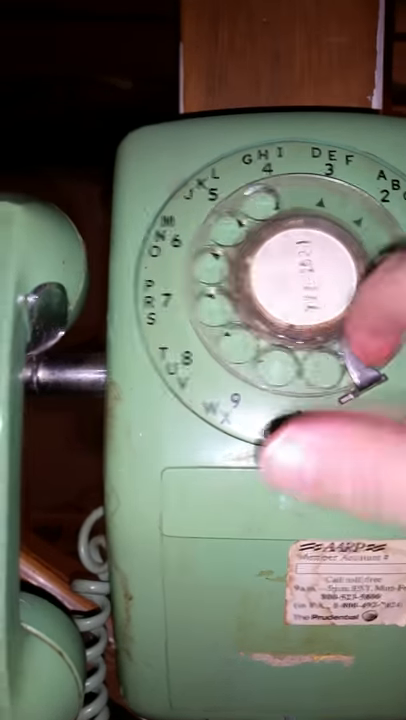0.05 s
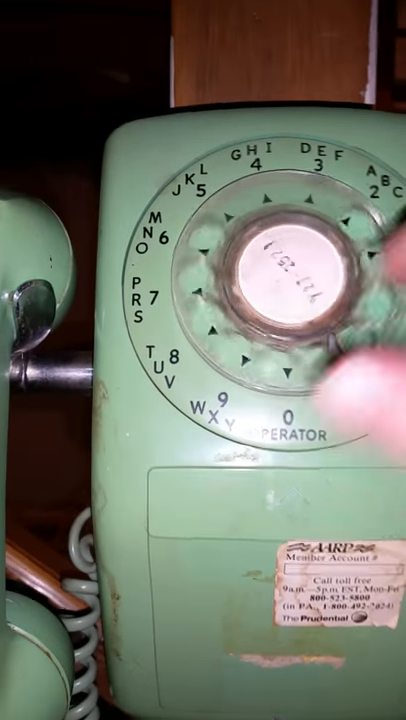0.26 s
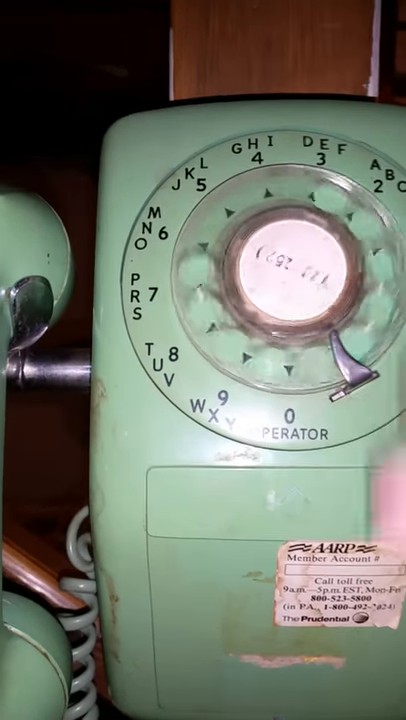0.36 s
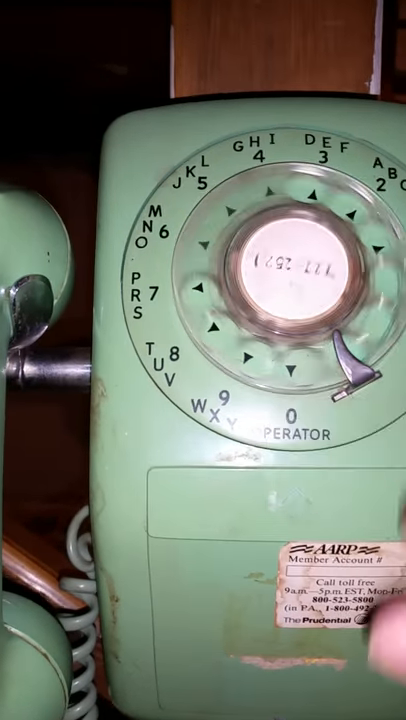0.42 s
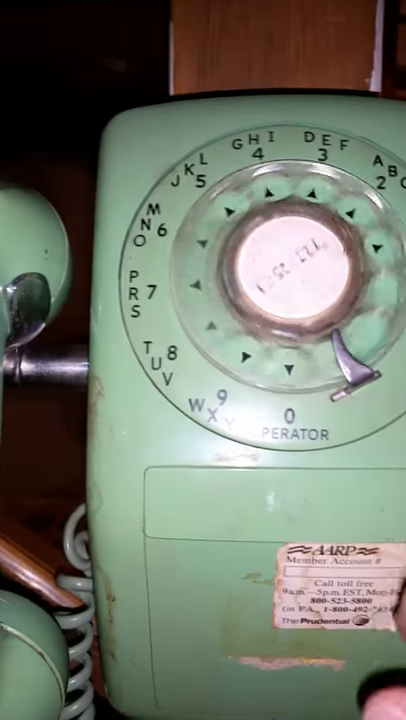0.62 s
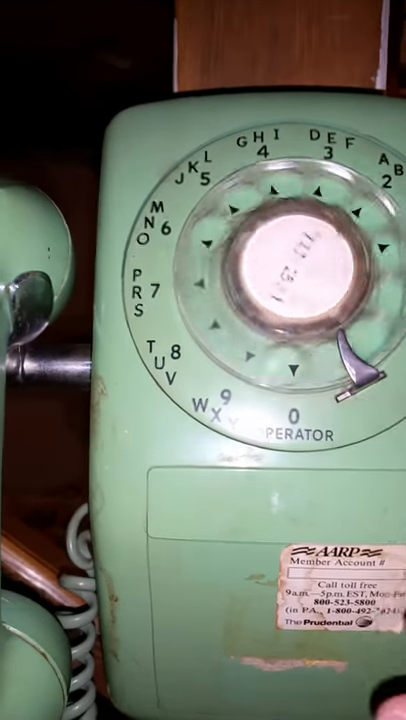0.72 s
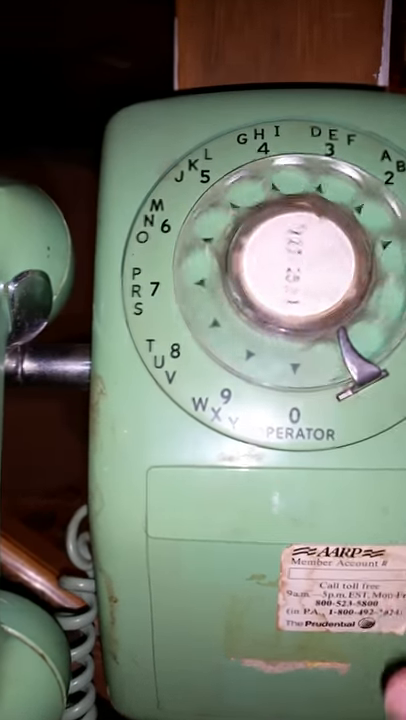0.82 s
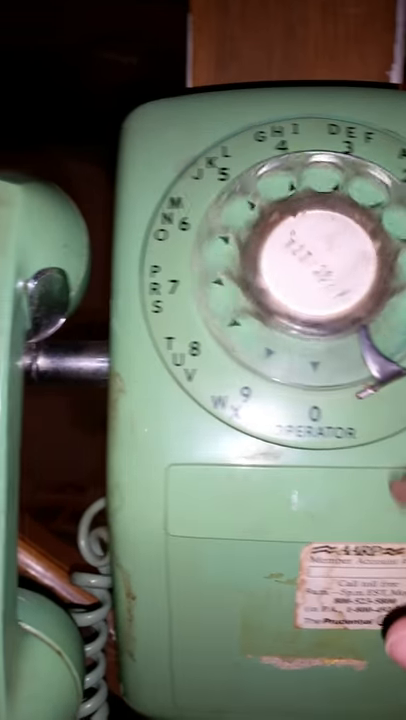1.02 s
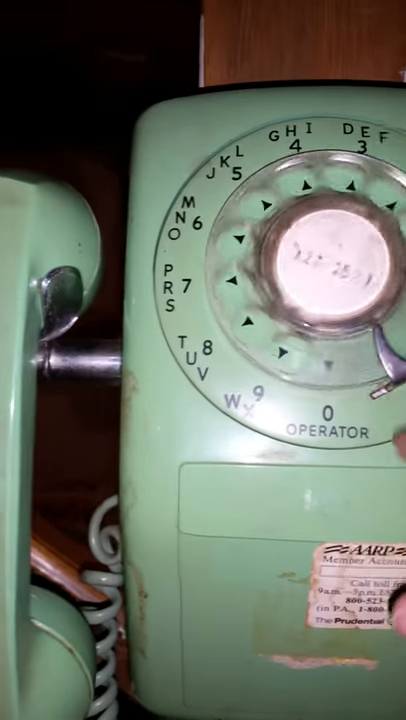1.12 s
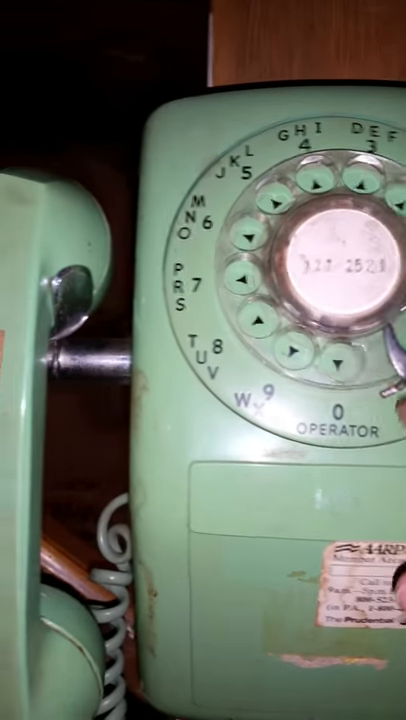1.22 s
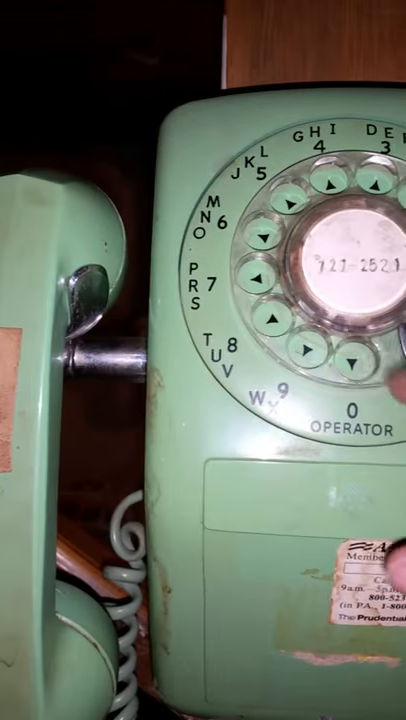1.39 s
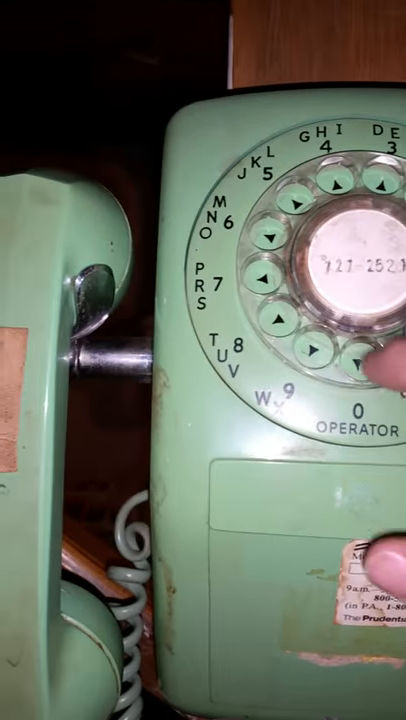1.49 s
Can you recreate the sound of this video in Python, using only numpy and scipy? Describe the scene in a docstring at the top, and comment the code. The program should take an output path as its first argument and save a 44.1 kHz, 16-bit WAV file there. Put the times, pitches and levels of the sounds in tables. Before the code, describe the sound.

Close rotary telephone dial clacking, then whirring and ticking home in a quiet room.

```python
"""A rotary telephone dial runs home, close by in a quiet room. The finger lets go and the wheel snaps
back with a clack; the spring drives whirring gears against a spinning governor, the contacts tick,
and the wheel lands on its stop. Knocks ring the hollow plastic housing, and the metal inside rings
on faintly. Soft air noise and a low hum lie underneath."""
import sys
import numpy as np
from scipy import signal
from scipy.fft import rfft, irfft
from scipy.io import wavfile
from scipy.ndimage import uniform_filter1d

SR = 44100
rng = np.random.default_rng(int(sys.argv[2]) if len(sys.argv) > 2 else 0)


def store_pcm(level_fs):
    """Save levels as 16-bit WAV."""
    pcm = np.round(np.clip(level_fs, -1, 1) * 32767).astype(np.int16)
    wavfile.write(sys.argv[1], SR, np.atleast_2d(pcm).T)


N = 68355
T = np.arange(N) / SR
HZ = np.fft.rfftfreq(4096, 1 / SR)  # frequency axis of the filter curves
CONTACT_RISE_S = 0.00021


def clacks(size=4096):
    """Each sharp blow chatters briefly and rings the dial's close resonances."""
    # blows: start_s, level_db, chatter_s, cutoff_hz, wheel_lift_db
    blows = [(0.068, -31.5, 0.0014, 6700, -3), (0.1823, -38.5, .002, 5940, -6),
             (0.2049, -27, 0.0022, 7000, 7), (0.2069, -14, 0.001, 6000, 9), (0.2077, 0, 0.0019, 14000, 0.5),
             (0.2125, -15.5, 0.0014, 9000, 2), (0.2227, -23, 0.0012, 7000, 2),
             (1.48, -27, 0.00071, 9000, 17)]
    # dial resonances: centre_hz, width_hz, left_db, right_db
    resonances = [(2550, 66, -23, -5.5), (2930, 113, -19.5, -7.5), (3350, 180, -8, -5.5),
                  (3830, 96, -8.5, -2), (4100, 140, -6, -6.5), (4125, 102, -10, -0.5),
                  (4540, 63, -7.5, -10.5), (5090, 110, -5.5, -14), (5400, 170, -9, -2),
                  (5760, 164, -11.5, 0), (6250, 164, -23, -2.5), (7050, 260, -28, -19),
                  (7730, 200, -33, -13.5), (9030, 590, -14, -16.5), (11280, 380, -15, -12)]
    floor_db, gain_db, low_cut_hz = -26.5, 12.5, 900
    peaks = sum(amp([[left], [right]]) ** 2 * bump(hz, width) for hz, width, left, right in resonances)
    ring_db = 10 * np.log10(amp(floor_db) ** 2 + peaks)
    ring_db -= 20 * np.log10(1 + (low_cut_hz / (HZ + 20)) ** 2)  # a small dial radiates no bass
    wheel_peak = bump(hz=6720, width_hz=690)
    out = np.zeros((2, N))
    for start_s, level_db, chatter_s, cutoff_hz, wheel_lift_db in blows:
        chatter = eased(burst(chatter_s, size), CONTACT_RISE_S)
        blow = unit(colour(chatter, ring_db + wheel_lift_db * wheel_peak))
        add(out, start_s, amp(gain_db + level_db) * dulled(blow, cutoff_hz))
    return out


def knocks(size=8192, gain_db=4.5, modes_db=-12):
    """The hollow housing answers dull knocks with a few clear modes among many close ones."""
    # knocks: start_s, level_db, cutoff_hz
    blows = [(0.0717, -14.5, 1030), (0.1891, -16, 3600), (0.2091, 2, 3500), (0.2214, -9, 2200),
             (1.113, -17, 1110), (1.2454, -15, 750), (1.258, -19.5, 3200), (1.483, -21.5, 1450)]
    # clearest housing modes: pitch_hz, t60_s, left_db, right_db
    clear_modes = [(445, 0.048, -25, -1.5), (505, 0.076, -23, 3), (670, 0.17, 0, -10), (842, 0.069, 5, -8),
                   (1012.5, .09, -1.5, 0), (1194, 0.22, -4.5, -25), (1689, 0.046, -1.5, -15),
                   (1816, 0.11, -3, 0)]
    # spectrum of the close modes: freq_hz, gain_db
    spectrum = [(60, -41.5), (200, -6.5), (350, -3.5), (500, 4.5), (620, -9), (780, 1.5), (1250, -4.5),
                (1700, 1), (2200, -9), (3500, -7.5), (7000, -18), (16000, -20.5)]
    # their decay: freq_hz, t60_s
    decay = [(200, 0.45), (350, .3), (600, 0.19), (1000, .14), (1700, 0.08), (5000, 0.023)]
    ring = amp(modes_db) * modes(clear_modes, size)
    out = np.zeros((2, N))
    for start_s, level_db, cutoff_hz in blows:
        dense = unit(colour(tail(decay, size), read(spectrum, HZ)))
        body = eased(ring + dense, rise_s=0.00035)
        add(out, start_s, amp(gain_db + level_db) * dulled(body, cutoff_hz))
    return out


def ticks(gain_db=-5.5, ring_db=7.5):
    """Small metal parts snap against each other as the wheel comes home."""
    # contacts and end stop: start_s, level_db, decay_s, pitch_hz
    snaps = [(0.313, -3, 0.0076, 5840), (0.543, -19, 0.002, 5300), (0.695, -8.5, 0.0007, 3600),
             (0.702, -2.5, 0.0015, 3530), (0.8214, 0.5, 0.0019, 5400), (0.826, -10, 0.0023, 5430),
             (0.876, -9, 0.0034, 4100), (0.926, -6.5, .0014, 3560), (0.9316, -1, 0.005, 3500),
             (1.049, -11, 0.0048, 4230), (1.052, 0, 0.0032, 4220), (1.151, -6, 0.0022, 5900),
             (1.18, -12, 0.003, 5900), (1.2534, -3.5, 0.0046, 5860), (1.2562, 1, 0.0034, 3450)]
    # tick spectrum: freq_hz, gain_db
    spectrum = [(200, -39), (1200, -10.5), (2600, -9.5), (3600, 2.5), (6000, -1.5), (7500, -8),
                (12000, -14), (16000, -19)]
    out = np.zeros((2, N))
    for start_s, level_db, decay_s, pitch_hz in snaps:
        chatter = eased(burst(decay_s), CONTACT_RISE_S)
        tick = colour(chatter, read(spectrum, HZ) + ring_db * bump(pitch_hz, width_hz=250))
        add(out, start_s, amp(gain_db + level_db) * unit(tick))
    return out * pan(db=-6)


def whirr():
    """Gears and governor run from release to stop; the gears also rustle as the finger ends its pull."""
    # governor speed: time_s, weight_passes_per_s
    speed = [(0.24, 76), (0.42, 80), (0.52, 79), (0.68, 76), (0.9, 77.8), (1.25, 70)]
    release_s, stop_s, spin_up_s, run_down_s = 0.235, 1.2527, 0.02, 0.0092
    pull_db, pull_end_s = -24, 0.14
    running = np.clip((T - release_s) / spin_up_s, 0, 1)
    running *= np.exp(-np.maximum(T - stop_s, 0) / run_down_s)
    pulling = amp(pull_db) * np.clip(1 - (T / pull_end_s) ** 2, 0, 1)
    pass_hz = np.interp(T, *np.transpose(speed)) * (1 + 0.004 * drift(hz=3.75))
    passes = np.cumsum(pass_hz) / SR
    throb, wobble = np.cos(2 * np.pi * passes), np.cos(np.pi * passes)  # two weights, one rubs harder
    drive = teeth_and_rub() * (1 + 0.13 * throb + 0.1 * wobble) * amp(0.97 * drift(hz=35))
    gears = gear_frame(drive)
    governor = governor_cup(drive) + governor_shoes(throb) + governor_hum(passes)
    return gears * (running + pulling) + governor * running


def teeth_and_rub(teeth_per_s=2600, spread_db=1.5, rub_gain=0.72):
    """Random tooth impacts over the friction noise of the governor."""
    impacts = (rng.random(N) < teeth_per_s / SR) * rng.choice([-1., 1.], N)
    impacts *= amp(spread_db * np.minimum(rng.exponential(1, N), 3))
    teeth = signal.fftconvolve(impacts[None], burst(decay_s=0.00095), axes=1)[:, :N]
    return unit_rms(unit_rms(teeth) + rub_gain * rng.standard_normal((2, N)))


def gear_frame(drive):
    """Teeth and friction shake the frame and its resonances."""
    # gear spectrum: freq_hz, left_db, right_db
    spectrum = [(92, -28, -22.5), (338, -12.5, -9), (760, -8, -8.5), (1360, -7.5, -9), (2150, -6.5, -5),
                (2870, -8.5, -5.5), (3930, -4, 0.5), (4740, -6.5, -7), (5210, -8, 0.5), (6700, -10, 3.5),
                (7020, -19, -8.5), (8930, -12.5, -18.5), (10300, -18, -18), (11700, -12.5, -11.5),
                (13200, -16, -17.5), (15700, -21, -17)]
    # frame resonances: centre_hz, width_hz, left_lift_db, right_lift_db
    resonances = [(540, 26, 3, 6), (745, 30, -8, -8), (1010, 26, 7, 8), (1183, 28, 7, 2), (1410, 70, 6, 4),
                  (1690, 50, -5, -5), (1830, 40, 2, 2), (1980, 60, 2, 3), (2140, 40, -5, -5),
                  (2290, 40, 4, 9), (2720, 30, 2, 3), (2890, 55, 5, 6), (3100, 40, 1, 3),
                  (3250, 60, -2, -3), (3490, 45, 2, 3), (3750, 50, 2, 3), (3870, 30, -3, -4),
                  (4010, 45, 6, 4), (4190, 65, 1, 5.5), (5840, 110, 0, 3), (7950, 130, 2, 5)]
    # gear envelope: time_s, level_db
    envelope = [(0.22, -37), (0.32, -36), (0.41, -36.5), (0.59, -37), (0.73, -37), (0.86, -36),
                (0.98, -36.5), (1.06, -36), (1.2, -38.5), (1.245, -36.5)]
    broad_db = np.array([read([(row[0], row[side]) for row in spectrum], HZ) for side in (1, 2)])
    lift_db = sum(np.array([[left], [right]]) * bump(hz, width) for hz, width, left, right in resonances)
    return unit_rms(colour(drive, broad_db + lift_db)) * level(envelope)


def governor_cup(drive, pitch_hz=2490, wander_hz=30):
    """The cup that the shoes rub sings in a narrow, wavering band."""
    # cup envelope: time_s, level_db
    envelope = [(0.3, -53), (0.7, -53), (0.85, -49.5), (1.25, -51.5)]
    ring = resonate(drive, pitch_hz + wander_hz * drift(hz=18), width_hz=150)
    return unit_rms(ring) * level(envelope) * pan(db=-8.5)


def governor_shoes(throb, flutter_db=2):
    """The rubbing shoes hiss thinly, pulsing with each pass of a weight."""
    # hiss peaks: centre_hz, half_width_hz, left_db, right_db
    resonances = [(13750, 170, 0.5, -4), (14550, 170, 3, -4), (14700, 350, -5, -10)]
    # hiss envelope: time_s, level_db
    envelope = [(0.22, -56), (0.33, -46), (0.43, -54), (0.5, -46), (0.6, -54), (0.74, -51), (0.88, -46.5),
                (1.12, -49), (1.19, -59), (1.26, -54)]
    peaks = sum(amp([[left], [right]]) / (1 + ((HZ - hz) / width) ** 2)
                for hz, width, left, right in resonances)
    friction = rng.standard_normal((2, N)) * (1 + 0.45 * throb)
    hiss = unit_rms(colour(friction, 20 * np.log10(peaks)))
    return hiss * level(envelope) * amp(flutter_db * drift(hz=60))


def governor_hum(passes):
    """The spinning weights shake the housing at multiples of their pass rate."""
    # hum partials: order, level_db
    partials = [(3, -56.5), (4, -65), (6, -66.5), (7, -61.5)]
    # hum envelope: time_s, gain_db
    envelope = [(0.3, -3), (0.49, 2), (0.62, -1), (0.76, -5.5), (0.93, -2), (1.25, -9.5)]
    hum = sum(amp(db) * wavering_tone(order * passes, depth=0.31, waver_hz=14) for order, db in partials)
    return hum * level(envelope)


def metal_ring():
    """The release and the stop jolt the metal inside, which rings on faintly."""
    # metal modes: pitch_hz, t60_s, left_db, right_db
    metal_modes = [(1834, 1.2, -3.5, -5), (1964, 0.38, -9, -1), (2365, 1.1, -7, -3.5),
                   (5440, 0.34, -10, -11)]
    # jolts: start_s, level_db
    jolts = [(0.209, -15.5), (1.257, -19.5)]
    out, ring = np.zeros((2, N)), modes(metal_modes, N)
    for start_s, level_db in jolts:
        add(out, start_s, amp(level_db) * ring)
    return out


def room(x, delay_s=0.006, gain_db=-12.5):
    """Short reverberation of a small furnished room."""
    # room decay: freq_hz, t60_s
    decay = [(200, 0.084), (1000, 0.46), (4000, 0.16), (8000, 0.19), (15000, 0.22)]
    out = np.zeros((2, N))
    add(out, delay_s, signal.fftconvolve(x, tail(decay, size=12288), axes=1))
    return amp(gain_db) * out


def background(air_db=-51):
    """Soft air noise and a low, wavering hum."""
    # air spectrum: freq_hz, gain_db
    spectrum = [(25, -36), (42, -17.5), (56, 2), (70, -14.5), (100, 2), (130, 6.5), (180, -2), (245, -1),
                (310, -10.5), (430, -9), (700, -14), (1200, -13), (1550, -16.5), (1900, -11.5), (2400, -14),
                (3300, -17), (4500, -24.5), (6000, -23.5), (8000, -34.5), (16000, -38)]
    # left-right likeness of the air: freq_hz, correlation
    likeness = [(60, 0.97), (200, 0.93), (500, 0.43), (1500, 0.1), (8000, 0.088)]
    # hum tones: pitch_hz, level_db
    tones = [(119.5, -59), (143.5, -63), (247, -64)]
    hz = np.fft.rfftfreq(N, 1 / SR)
    left, independent = rfft(rng.standard_normal((2, N)))
    correlation = np.clip(read(likeness, hz), -1, 1)
    right = correlation * left + np.sqrt(1 - correlation ** 2) * independent
    air = unit_rms(irfft(np.array([left, right]) * amp(read(spectrum, hz)), N))
    hum = sum(amp(db) * wavering_tone(pitch_hz * T, depth=0.3, waver_hz=2.8) for pitch_hz, db in tones)
    return amp(air_db) * air + hum


def burst(decay_s, size=2048):
    """A brief chatter of contact."""
    return flattened(rng.standard_normal((2, size)) * np.exp(-T[:size] / decay_s), smooth_hz=400)


def tail(decay, size):
    """Dense reflections with a flat spectrum, each band dying at its own rate."""
    hz, t, bands = signal.stft(rng.choice([-1., 1.], (2, size)), SR, nperseg=256)
    bands = bands * 1000 ** (-t / read(decay, hz)[:, None])
    return flattened(signal.istft(bands, SR, nperseg=256)[1][:, :size], smooth_hz=250)


def modes(table, size):
    """Damped sines, each with its own left and right level."""
    t, out = T[:size], np.zeros((2, size))
    for pitch_hz, t60_s, left_db, right_db in table:
        sine = np.sin(2 * np.pi * (pitch_hz * t + rng.random((2, 1))))
        out += amp([[left_db], [right_db]]) * unit(sine * 1000 ** (-t / t60_s))
    return out


def wavering_tone(cycles, depth, waver_hz):
    """A sine of rms 1 whose level drifts."""
    return unit_rms((1 + depth * drift(waver_hz)) * np.sin(2 * np.pi * (cycles + rng.random())))


def drift(hz):
    """Slow random motion of rms 1."""
    f = np.fft.rfftfreq(N, 1 / SR)
    return unit_rms(irfft(rfft(rng.standard_normal(N)) * np.exp(-(f / hz) ** 2) * (f > 0), N))


def resonate(x, hz, width_hz):
    """A resonance that follows the curve hz."""
    carrier = np.exp(2j * np.pi * np.cumsum(hz) / SR)
    pole = np.exp(-np.pi * width_hz / SR)
    return (carrier * signal.lfilter([(1 - pole) ** 2], [1, -2 * pole, pole ** 2], x / carrier)).real


def colour(x, db):
    """Minimum-phase filter with gain db over HZ."""
    cepstrum = irfft(np.log(amp(db)))
    cepstrum[..., 1:len(HZ) - 1] *= 2
    cepstrum[..., len(HZ):] = 0
    impulse = np.atleast_2d(irfft(np.exp(rfft(cepstrum))))
    return signal.fftconvolve(x, impulse, axes=1)[:, :x.shape[1]]


def flattened(x, smooth_hz):
    """Evens out the broad colour of a random burst."""
    power = abs(rfft(x, 2 * (len(HZ) - 1))) ** 2
    smoothed = uniform_filter1d(power, round(smooth_hz / HZ[1]), axis=1)
    return unit(colour(x, -10 * np.log10(abs(smoothed) + 1e-9)))


def dulled(x, cutoff_hz):
    """Low-pass: a softer blow loses its treble."""
    return colour(x, -10 * np.log10(1 + (HZ / cutoff_hz) ** 4))


def eased(x, rise_s):
    """Softens an attack: contact takes a moment to build."""
    return x * (1 - np.exp(-T[:x.shape[1]] / rise_s))


def centred(x, below_hz):
    """Centres the bass: long waves reach both ears alike."""
    hz = np.fft.rfftfreq(N, 1 / SR)
    side = irfft(rfft(x[0] - x[1]) * hz ** 2 / (hz ** 2 + below_hz ** 2), N) / 2
    return x.mean(0) + np.array([side, -side])


def bump(hz, width_hz):
    """Gaussian peak over HZ."""
    return np.exp(-.5 * ((HZ - hz) / width_hz) ** 2)


def read(points, hz):
    """Interpolates a two-column table over log frequency."""
    f, value = np.transpose(points)
    return np.interp(np.log(hz + 1), np.log(f + 1), value)


def level(points):
    """Gain over time from time_s, level_db points."""
    return amp(np.interp(T, *np.transpose(points)))


def pan(db):
    """Stereo gains for a left-minus-right level."""
    return amp([[db / 2], [-db / 2]])


def amp(db):
    """Decibels to gain."""
    return 10 ** (np.asarray(db) / 20)


def unit_rms(x):
    """Scales to rms 1."""
    return x / np.sqrt(np.mean(x ** 2) + 1e-20)


def unit(x):
    """Scales to a mean energy of 1 per channel."""
    return unit_rms(x) / np.sqrt(x.shape[-1])


def add(mix, start_s, sound):
    """Mixes in a stereo sound."""
    part = mix[:, round(start_s * SR):][:, :sound.shape[1]]
    part += sound[:, :part.shape[1]]


def scene():
    """The telephone in its room."""
    phone = clacks() + knocks() + ticks() + whirr() + metal_ring()
    return centred(phone + room(phone), below_hz=320) + background()


def record(dry):
    """Rounds the highest peaks and limits the band."""
    peak_limit, cutoff_hz = 0.76, 15900
    rounded = peak_limit * np.tanh(dry / peak_limit)
    low_pass = signal.firwin(301, cutoff_hz, window=("kaiser", 8), fs=SR)
    return signal.oaconvolve(rounded, low_pass[None], "same")


dry = scene()
out = record(dry)
store_pcm(out)
```